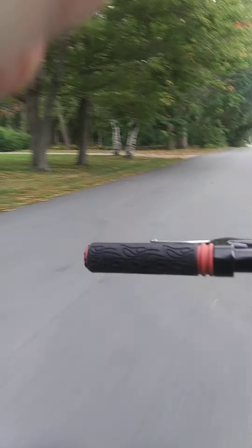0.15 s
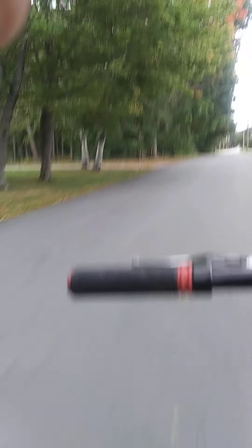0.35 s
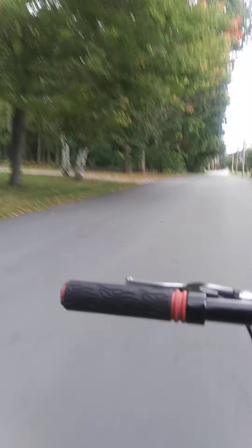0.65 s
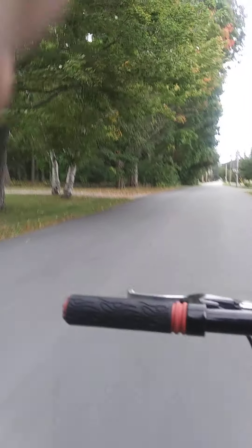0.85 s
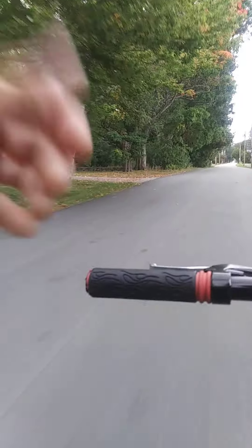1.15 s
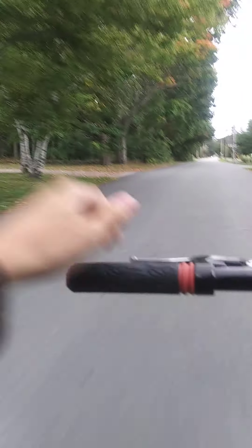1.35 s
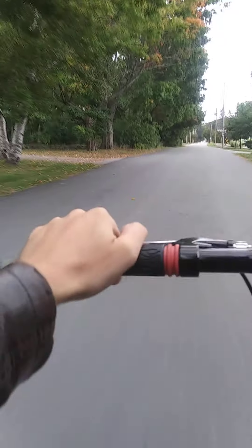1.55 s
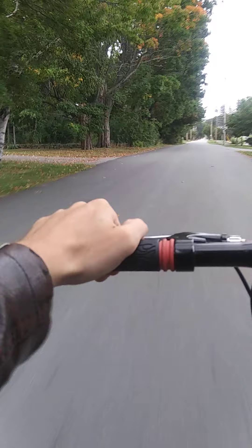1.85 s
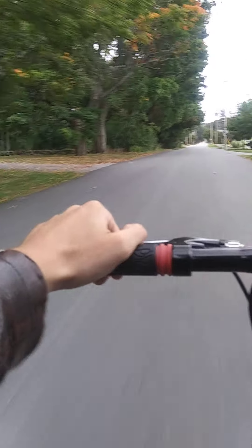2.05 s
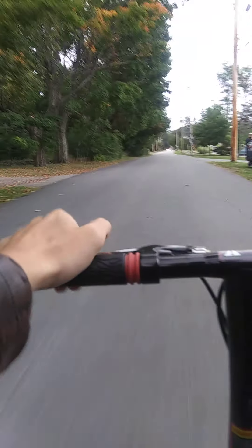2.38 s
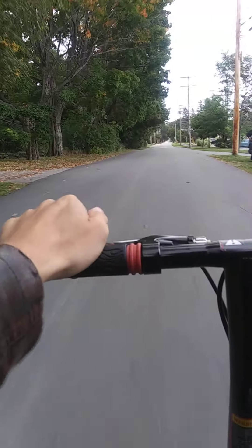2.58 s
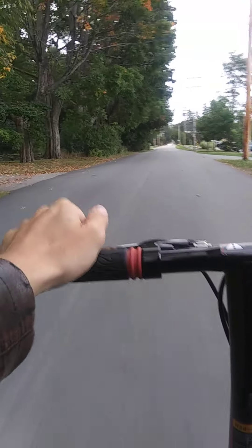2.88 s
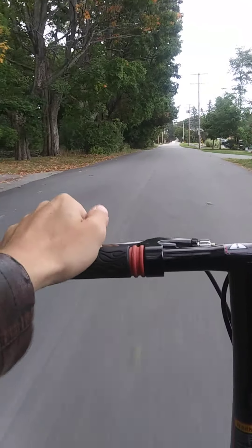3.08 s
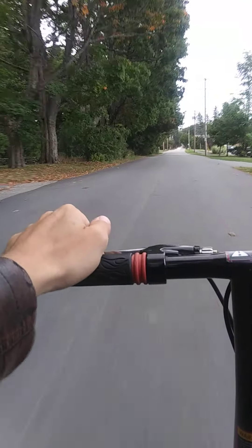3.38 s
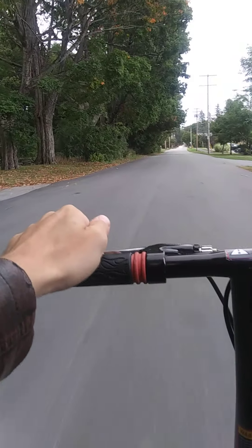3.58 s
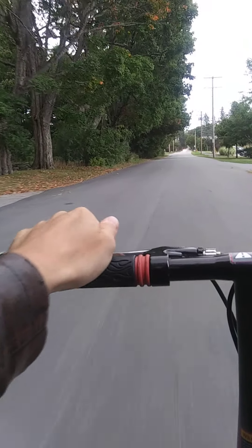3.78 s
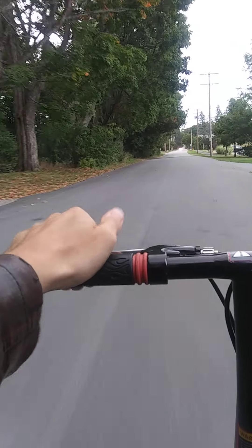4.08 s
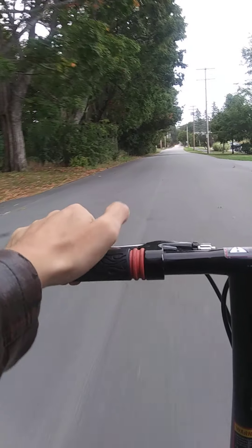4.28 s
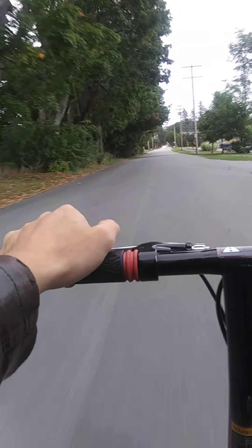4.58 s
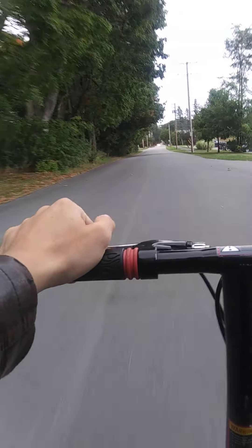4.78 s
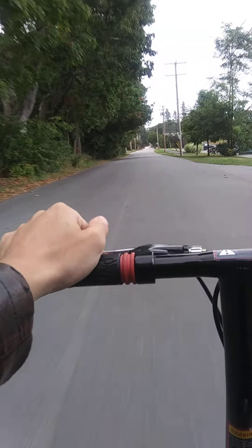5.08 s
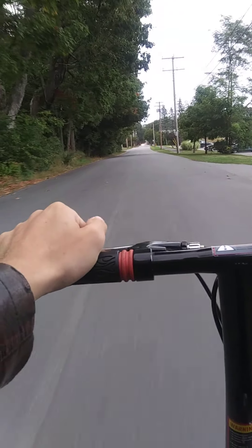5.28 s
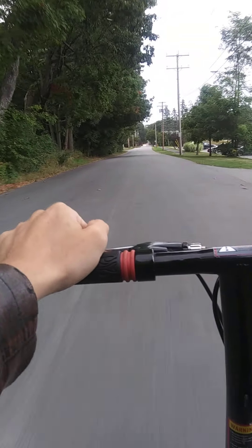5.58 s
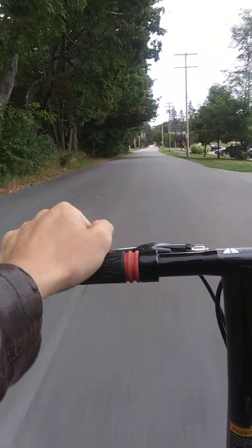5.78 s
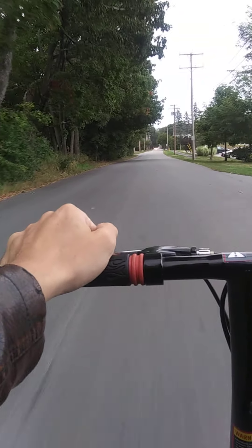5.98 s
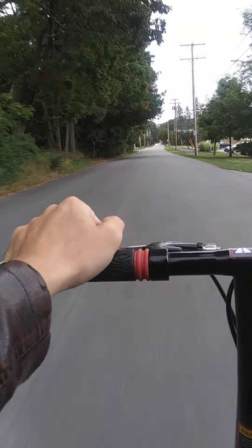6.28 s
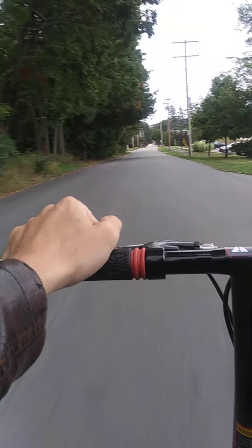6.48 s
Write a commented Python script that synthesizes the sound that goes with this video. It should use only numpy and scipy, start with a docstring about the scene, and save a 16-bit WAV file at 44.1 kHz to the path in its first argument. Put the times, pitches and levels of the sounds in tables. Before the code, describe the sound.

An electric scooter gathers speed gently on smooth asphalt outdoors, heard from a phone held by the rider. A clear mid-pitched motor whine creeps upward over a throbbing tyre roar, frame buzz and thin air hiss. Fingers rub across the phone during the first second and a half, with a quick click and knock early on; afterwards come faint sleeve rustles, grip shifts and scattered handlebar ticks.

```python
"""A motor whine and the roar of tyres come first, joined almost at once by fingers rubbing on a phone.
It is an electric scooter gathering speed on smooth asphalt, heard from the phone in the rider's hand.
The wheel's angle drives sine partials in the hub motor, one throbbing every turn, and a repeating tread.
Shaped noise makes the road, frame buzz, low rumble and air hiss; tiny random slips make the rubbing.
Early knocks ring briefly on the phone; later, snaps with a little chatter tick on the handlebar."""
import sys
import numpy as np
from scipy import signal
from scipy.fft import rfft, irfft
from scipy.io import wavfile

SR = 44100
rng = np.random.default_rng(int(sys.argv[2]) if len(sys.argv) > 2 else 0)


def inscribe(sig):
    """Save sig as 16-bit PCM at rate SR to the path in sys.argv[1].

    A 1-D sig is mono; a 2-D sig holds one channel per row.
    Samples are clipped to [-1, 1] before scaling.
    """
    pcm = np.round(np.clip(np.atleast_2d(sig).T, -1, 1) * 32767)
    wavfile.write(sys.argv[1], SR, pcm.astype(np.int16))


N = 292824
TIME = np.arange(N) / SR
FREQS = np.fft.rfftfreq(N, 1 / SR)


def from_db(db):
    """Turn decibels into a gain."""
    return 10 ** (np.asarray(db) / 20)


def rms_one(x):
    """Scale a signal so that its average strength (rms) is 1."""
    return x / np.sqrt(np.mean(x ** 2) + 1e-20)


def over_time(rows):
    """Join the (time, value) points of a table with straight lines, one value per sample."""
    times, values = np.transpose(rows)
    return np.interp(TIME, times, values)


def drift(hz):
    """Random wandering of rms 1: noise whose changes faster than about hz are weakened."""
    return rms_one(irfft(rfft(rng.standard_normal(N)) / (1 + (FREQS / hz) ** 2), N))


def gain_at(spectrum, hz):
    """Read a tone-colour table as gain, joining its points along a logarithmic pitch axis."""
    points, db = np.transpose(spectrum)
    return from_db(np.interp(np.log(hz + 1), np.log(points), db))


def colour(x, spectrum):
    """Filter a sound to a tone colour, then set its rms to 1."""
    return rms_one(irfft(rfft(x) * gain_at(spectrum, FREQS), N))


def noise(spectrum):
    """Steady random noise with a given tone colour and rms 1."""
    return colour(rng.standard_normal(N), spectrum)


def ring(force, hz, t60):
    """A blow starts a sine that dies away by 60 dB in t60 seconds."""
    radius = from_db(-60 / (t60 * SR))
    step = 2 * np.pi * hz / SR
    feedback = [1, -2 * radius * np.cos(step), radius * radius]
    return signal.lfilter([0, np.sin(step)], feedback, force + 1e-18)


def blow(time, height):
    """A blow that lasts a single sample."""
    out = np.zeros(N)
    out[round(time * SR)] = height
    return out


def friction(per_s, spread_db):
    """Rubbing surfaces make dense tiny slips, at random moments and of uneven size."""
    sizes = from_db(spread_db * np.minimum(rng.exponential(1, N), 5))
    slips = rng.random(N) < per_s / SR
    return slips * sizes * rng.standard_normal(N)


def strokes(rows):
    """Add up smooth strokes; each gain falls to 1/e of its peak one half length away."""
    return sum(from_db(db) * np.exp(-((TIME - peak) / half) ** 2) for peak, half, db in rows)


WHINE_ORDER = 98  # whine cycles per wheel turn
# Pitch of the whine as the scooter gathers speed: (time [s], pitch [Hz])
WHINE_PITCH = [(0.0, 575.6), (0.58, 589.2), (2.01, 600.9), (3.87, 608.0), (4.23, 607.0), (6.03, 616.0),
               (6.64, 621.1)]


def wheel_turns():
    """The whine has a fixed number of cycles per turn, so its pitch gives the wheel's angle in turns."""
    return np.cumsum(over_time(WHINE_PITCH)) / (WHINE_ORDER * SR)


BETWEEN_SPOTS_DB = -6.5
# High spots of the wheel: (position [turns], half width [turns], swell [dB])
WHEEL_HIGH_SPOTS = [(.238, 0.041, 11.5), (.47, 0.033, .5), (.8, 0.076, 1), (.905, 0.026, 2.5)]


def runout(turns):
    """The wheel is slightly out of true, so each high spot gives a smooth swell once per turn."""
    swell = from_db(BETWEEN_SPOTS_DB)
    for position, half, db in WHEEL_HIGH_SPOTS:
        distance = (turns - position + 0.5) % 1 - 0.5
        swell = swell + from_db(db) * np.exp(-(distance / half) ** 2)
    return swell


# Course of the whine, before whine_db is added: (time [s], level [dB])
WHINE_COURSE = [(0.1, -26.5), (0.88, -24), (1.65, -27), (3.61, -27.5), (6.46, -31), (6.5, -31.5)]
# Steady motor partials beside the whine: (rate [cycles per turn])
STEADY_ORDERS = [49, 245]
# Their peak levels in the same order: (level [dB])
STEADY_LEVELS = [-48, -65]
# Motor partials that throb with the wheel: (rate [cycles per turn])
THROBBING_ORDERS = [147, 245]
# Their levels in the same order, relative to the shared throb: (level [dB])
THROBBING_LEVELS = [-0.5, -24.5]
# The throb grows with speed until the whine reaches its cruising pitch
THROB_LEVEL_DB, THROB_DB_PER_HZ, CRUISE_HZ = -30, 0.2, 607


def motor(turns, whine_db=3.5, sway=0.087, waver_db=0.3, rough_db=1.4, wobble_rad=0.33, load_db=0.56):
    """The hub motor sums sines locked to the wheel: a clean whine, steady partials and throbbing ones."""
    swell = runout(turns)
    angle = 2 * np.pi * turns
    level = from_db(over_time(WHINE_COURSE) + whine_db + waver_db * drift(7.6))
    out = level * (1 + sway * (swell - 1)) * np.sin(WHINE_ORDER * angle)
    for order, db in zip(STEADY_ORDERS, STEADY_LEVELS):
        out += from_db(db) * np.sin(order * angle)
    below_cruise = np.maximum(CRUISE_HZ - over_time(WHINE_PITCH), 0)
    # The load on the wheel wanders
    throb_db = THROB_LEVEL_DB - THROB_DB_PER_HZ * below_cruise + load_db * drift(3.7)
    throb = swell * from_db(throb_db)
    for order, db in zip(THROBBING_ORDERS, THROBBING_LEVELS):
        # The uneven road shakes both strength and phase
        strength = throb * from_db(db + rough_db * drift(30))
        out += strength * np.sin(order * angle + wobble_rad * drift(31))
    return out


# Tone colour of the roar, only its shape counts: (frequency [Hz], level [dB])
ROAD_COLOUR = [(60, -65), (150, -38), (240, -15), (335, 0), (390, 2.5), (460, -9.5), (560, 1.5), (830, -3),
               (950, -3), (1100, -10), (1500, -11.5), (2000, -22), (3500, -37), (12000, -71)]
# Tone colour of the worn tread, only its shape counts: (frequency [Hz], level [dB])
TREAD_COLOUR = [(60, -75), (260, -13.5), (335, 2), (460, -2), (600, 1.5), (700, 2), (810, 6.5), (860, 1.5),
                (920, 4), (1050, -10), (1300, -11), (1530, -12), (1700, -22), (8000, -79.5)]
# Pitches at which the tread blocks sing: (rate [cycles per turn])
BLOCK_NOTES = [54, 58, 131, 134, 144]
# Their rms levels in the same order, before the patchy wander: (level [dB])
BLOCK_LEVELS = [-54.5, -52.5, -46.5, -47, -43]


def tyres(turns, road_db=-36.0, tread_db=-35, patchy_db=1.0):
    """Asphalt gives a noisy roar; the tread adds a pattern and faint notes that repeat on every turn."""
    size = 8192  # points around the wheel
    mean_turn_hz = turns[-1] * SR / N
    orders = np.arange(size // 2 + 1)
    random_phases = np.exp(2j * np.pi * rng.random(len(orders)))
    bumps = rms_one(irfft(gain_at(TREAD_COLOUR, orders * mean_turn_hz) * random_phases))
    tread = np.interp(turns % 1, np.arange(size) / size, bumps)
    notes = np.zeros(N)
    for order, db in zip(BLOCK_NOTES, BLOCK_LEVELS):
        notes += from_db(db) * np.sqrt(2) * np.sin(2 * np.pi * (order * turns + rng.random()))
    road = from_db(road_db + patchy_db * drift(9.1)) * noise(ROAD_COLOUR)
    pattern = from_db(tread_db) * tread + notes
    return road + from_db(patchy_db * drift(6.9)) * pattern


# Resonances of the frame: (frequency [Hz], half width where the gain halves [Hz], rms level [dB])
FRAME_RESONANCES = [(340, 18.3, -47.5), (741, 29, -42), (923, 51, -38), (1540, 26, -56.5),
                    (2444, 35, -64.5), (4260, 45, -68.5), (4650, 67, -73.5), (5026, 39, -66),
                    (6020, 70, -66), (6800, 83, -69), (8460, 300, -76.5), (10300, 230, -84)]


def frame():
    """The road keeps the frame buzzing: one noise passes through many narrow resonances."""
    shake = rfft(rng.standard_normal(N))
    buzz = np.zeros(N)
    for hz, width, db in FRAME_RESONANCES:
        resonance = 1 / (1 + ((FREQS - hz) / width) ** 2)
        buzz += from_db(db) * rms_one(irfft(shake * resonance, N))
    return buzz


# Tone colour of the rumble, only its shape counts: (frequency [Hz], level [dB])
RUMBLE_COLOUR = [(25, -35), (65, -33.5), (100, -16), (150, -4.5), (210, 0.5), (260, -1.5), (340, -18.5),
                 (700, -59.5)]
# Longer swells added to the rumble: (time [s], half length [s], level [dB])
LONG_SWELLS = [(.45, .08, -62), (1.15, 0.1, -64), (3.55, .25, -64), (4.04, 0.15, -57), (4.55, 0.21, -65),
               (5.45, 0.15, -56.5), (5.95, .1, -63)]


def rumble(rumble_db=-62, wander_db=4.5):
    """Road and wind give a weak low noise that wanders in level, with a few longer swells."""
    level = from_db(rumble_db + wander_db * drift(3)) + strokes(LONG_SWELLS)
    return level * noise(RUMBLE_COLOUR)


# Tone colour of the hiss, only its shape counts: (frequency [Hz], level [dB])
AIR_COLOUR = [(800, -19), (1800, -11), (2800, 3), (3550, -6), (4400, 0), (5200, 3.5), (6300, -0.5),
              (7500, -8), (9500, -13), (12000, -19.5), (14800, -20.5), (15800, -34.5)]


def air(hiss_db=-54.5, flutter_db=1.13):
    """Passing air makes a smooth, thin hiss: noise with a slight flutter in level."""
    return from_db(hiss_db + flutter_db * drift(15)) * noise(AIR_COLOUR)


# Finger strokes on the phone, before rubbing() raises the scrape:
# (time of the peak [s], swell [s], fade [s], dull scrape level [dB], bright swish level [dB])
FINGER_RUBS = [(0.031, 0.019, 0.009, -38, -58), (.095, 0.03, 0.069, -38.5, -49.5),
               (.285, 0.066, 0.076, -30.5, -37.5), (.46, 0.076, 0.028, -30.5, -31),
               (.645, 0.058, 0.026, -37.5, -38.5), (.765, 0.039, .02, -37.5, -36),
               (.825, 0.022, 0.041, -42, -43), (.96, 0.044, 0.052, -40, -38.5),
               (1.11, 0.094, .055, -35.5, -35.5), (1.265, 0.1, 0.047, -35.5, -43),
               (1.365, 0.053, 0.069, -36.5, -45), (1.51, 0.034, 0.057, -40, -48.5)]


def finger_strokes():
    """Each stroke swells and fades in a dull and a bright part; overlapping strokes add in power."""
    power = np.zeros((2, N))
    for peak, swell, fade, dull_db, bright_db in FINGER_RUBS:
        length = np.where(TIME < peak, swell, fade)
        shape = np.exp(-np.minimum(((TIME - peak) / length) ** 2, 20))
        power += (from_db([[dull_db], [bright_db]]) * shape) ** 2
    return np.sqrt(power)


# The hand shifts on the rubber grip, before grip_db is added: (time [s], half length [s], level [dB])
GRIP_SHIFTS = [(1.85, 0.019, -51), (2.25, 0.09, -56.5), (2.4, 0.032, -53.5), (2.6, 0.026, -48),
               (3.293, 0.0054, -45)]
# The sleeve stirs: (time [s], half length [s], level [dB])
SLEEVE_STIRS = [(1.96, 0.028, -51.5), (2.24, 0.068, -52.5), (2.385, 0.063, -57), (2.955, .02, -52),
                (4.33, 0.018, -51), (5.296, 0.013, -52), (5.76, .035, -52), (5.887, 0.015, -51),
                (6.17, 0.039, -49.5), (6.328, .015, -53), (6.585, 0.067, -52.5)]
# Tone colour of the dull scrape, only its shape counts: (frequency [Hz], level [dB])
SCRAPE_COLOUR = [(100, -32), (280, 5), (900, 10), (1400, 6.5), (2200, -1), (3100, -9), (5000, -13.5),
                 (12000, -36.5)]
# Tone colour of the bright swish, only its shape counts: (frequency [Hz], level [dB])
SWISH_COLOUR = [(1000, -26), (2500, -1), (3600, -5), (5200, 1.5), (6600, 0), (8000, -7), (9500, -16),
                (13000, -18.5), (16000, -23)]
# Tone colour of the sleeve's cloth, only its shape counts: (frequency [Hz], level [dB])
CLOTH_COLOUR = [(1000, -15), (2500, 11), (3600, 6), (5500, 11), (7500, 6), (9500, -2), (13000, -9),
                (16000, -20)]


def rubbing(scrape_db=4.0, grip_db=10.5, grab_db=0.77):
    """Tiny slips sound as fingers slide over the phone, the sleeve stirs and the hand shifts on the grip."""
    dull, bright = finger_strokes() * from_db(grab_db * drift(40))  # skin sticks and lets go
    pressure = from_db(scrape_db) * dull + from_db(grip_db) * strokes(GRIP_SHIFTS)
    scrape = pressure * colour(friction(per_s=5000, spread_db=2.0), SCRAPE_COLOUR)
    swish = bright * colour(friction(per_s=10000, spread_db=1.0), SWISH_COLOUR)
    sleeve = strokes(SLEEVE_STIRS) * colour(friction(per_s=8000, spread_db=4.5), CLOTH_COLOUR)
    return scrape + swish + sleeve


# Sharp clicks on the phone, before the bass cut: (time [s], height [dB], ring pitch [Hz])
CASE_CLICKS = [(0.2777, -17, 5800), (0.3004, -4.5, 4900)]
# Soft knocks on the phone, before knock_db and the bass cut: (time [s], height [dB], ring pitch [Hz])
CASE_KNOCKS = [(.3007, -7.5, 1120), (0.3061, -13, 840), (0.3146, -7, 644)]


def knocks(click_t60=0.0013, knock_t60=0.0054, knock_db=4.0, body_hz=330):
    """A finger catches on the case: dry clicks and dead bumps ring briefly; the small case gives no bass."""
    clicks = sum(ring(blow(s, from_db(db)), hz, click_t60) for s, db, hz in CASE_CLICKS)
    bumps = sum(ring(blow(s, from_db(db + knock_db)), hz, knock_t60) for s, db, hz in CASE_KNOCKS)
    bass_cut = signal.butter(3, body_hz, "high", fs=SR, output="sos")
    return signal.sosfilt(bass_cut, clicks + bumps)


# Handlebar ticks, before tick_db and the tone colour are applied; only differences in slope count:
# (time [s], height [dB], treble slope [dB per octave, roughly])
BAR_TICKS = [(1.931, -23, -10), (3.219, -33, -10.5), (3.2923, -24.5, -18), (4.0298, -16, -18),
             (4.0653, -26, -17), (4.802, -32, -8), (4.8209, -26, -11.5), (5.6142, -28, -9),
             (6.023, -23, -14), (6.0448, -19.5, -12)]
# Tone colour shared by the ticks: (frequency [Hz], gain [dB])
BAR_COLOUR = [(200, -32), (1000, -2), (1800, 9), (2800, 8.5), (3600, 1), (5000, 6.5), (7000, -1),
              (10000, -14), (16000, -27)]


def handlebar(tick_db=4, chatter_db=-17, chatter_s=0.0016):
    """Each tick is a dry snap with a few milliseconds of fading chatter, duller or brighter."""
    size = 2048  # samples around each snap
    age = (np.arange(size) - size // 2) / SR
    hz = np.fft.rfftfreq(size, 1 / SR)
    octaves = np.log2((hz + 500) / 4000)
    usual_slope = np.mean([slope for s, db, slope in BAR_TICKS])
    out = np.zeros(N)
    for s, db, slope in BAR_TICKS:
        chatter = (age > 0) * np.exp(-np.abs(age) / chatter_s) * rng.standard_normal(size)
        snap = (age == 0) + from_db(chatter_db) * chatter
        tone = gain_at(BAR_COLOUR, hz) * from_db((slope - usual_slope) * octaves)
        start = round(s * SR) - size // 2
        out[start:start + size] += from_db(db + tick_db) * irfft(rfft(snap) * tone)
    return out


def scene(start_db=-1.0, settled_s=0.45):
    """The wheel drives motor and tread; tyres and frame build a little at first; the other layers add on."""
    turns = wheel_turns()
    build = from_db(np.interp(TIME, [0, settled_s], [start_db, 0]))
    ride = motor(turns) + build * (tyres(turns) + frame()) + rumble() + air()
    return (ride + rubbing() + knocks() + handlebar())[None]


def record(dry, bass_hz=90, cutoff_hz=15900):
    """The phone thins the deep bass and cuts the top sharply."""
    bass_cut = signal.butter(2, bass_hz, "high", fs=SR, output="sos")
    top_cut = signal.ellip(10, 0.1, 70, cutoff_hz, fs=SR, output="sos")
    return signal.sosfilt(top_cut, signal.sosfilt(bass_cut, dry))


dry = scene()
out = record(dry)
inscribe(out)
```